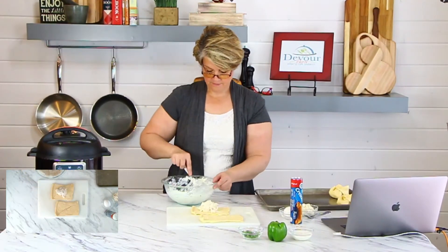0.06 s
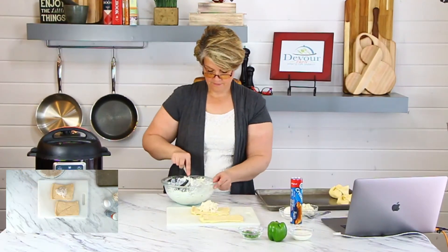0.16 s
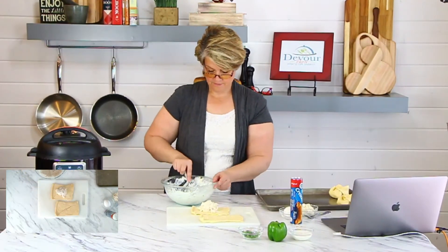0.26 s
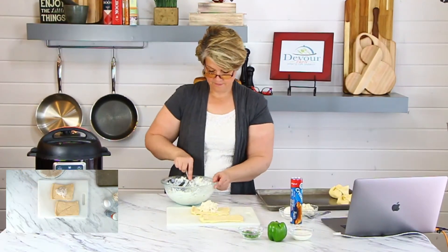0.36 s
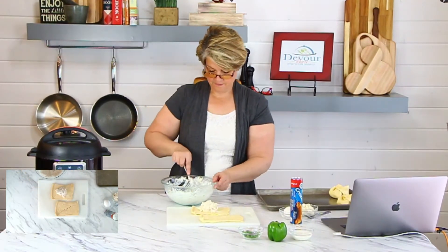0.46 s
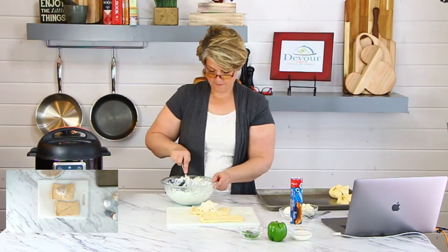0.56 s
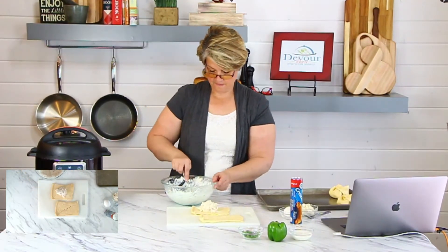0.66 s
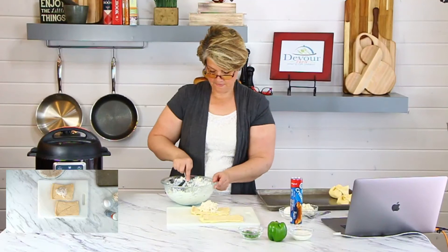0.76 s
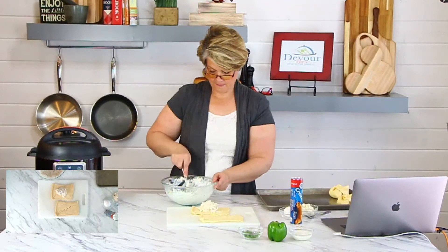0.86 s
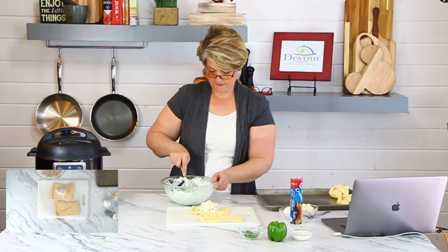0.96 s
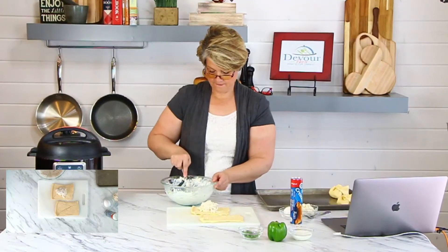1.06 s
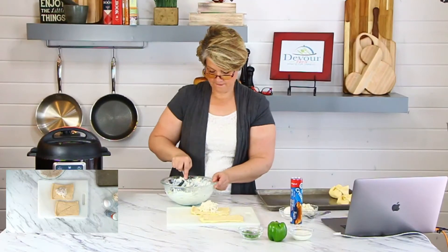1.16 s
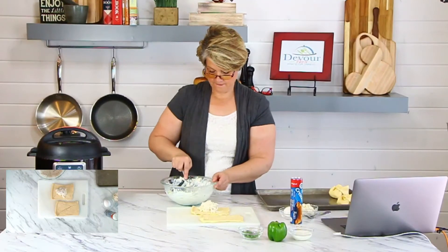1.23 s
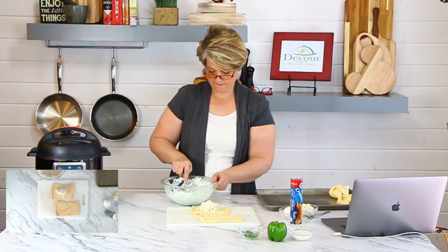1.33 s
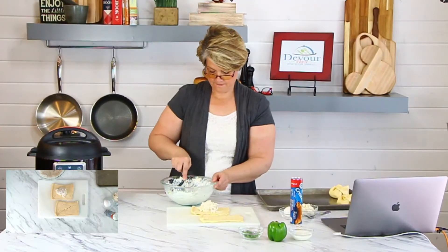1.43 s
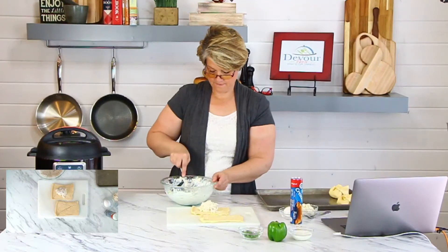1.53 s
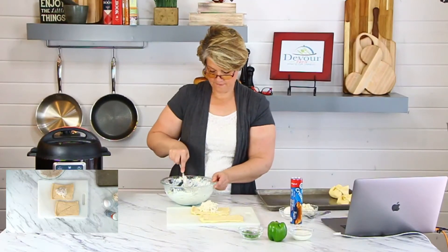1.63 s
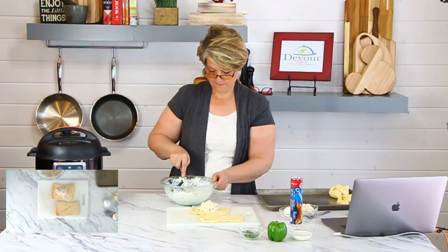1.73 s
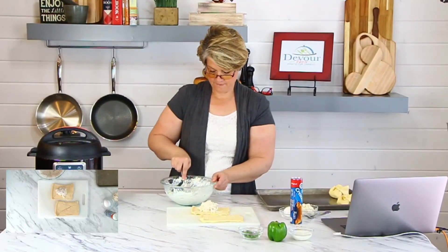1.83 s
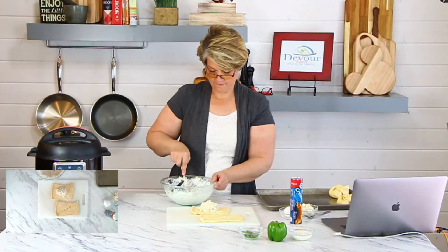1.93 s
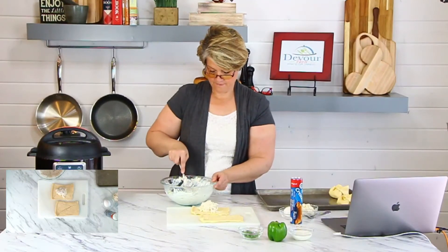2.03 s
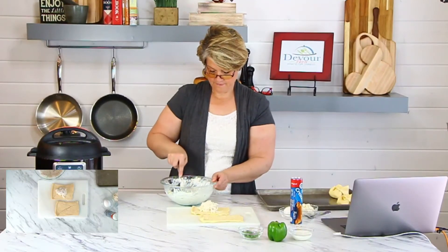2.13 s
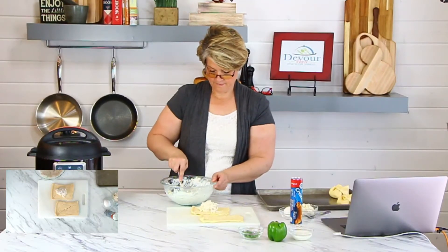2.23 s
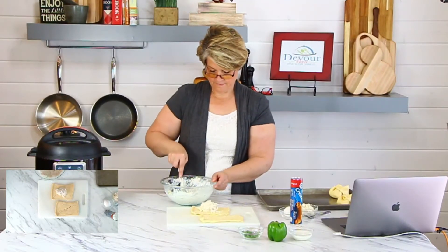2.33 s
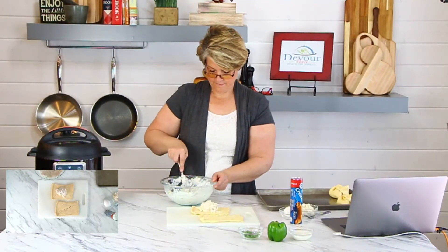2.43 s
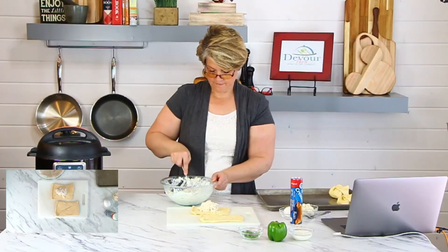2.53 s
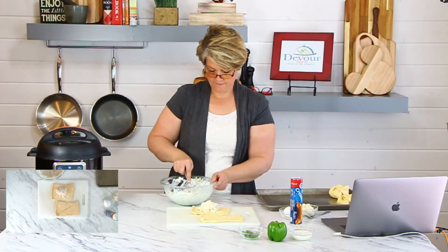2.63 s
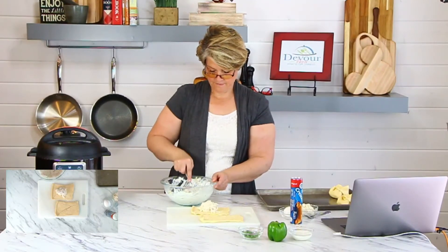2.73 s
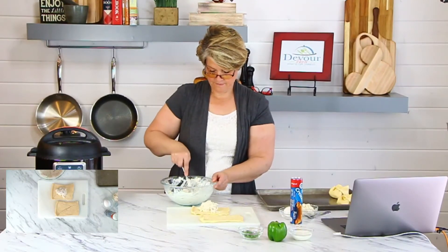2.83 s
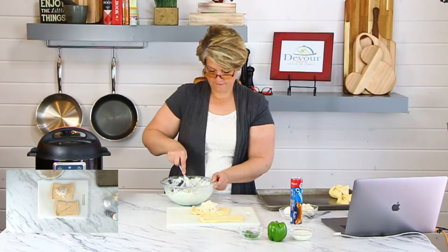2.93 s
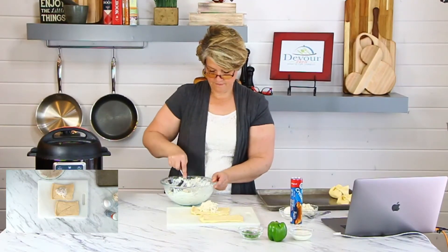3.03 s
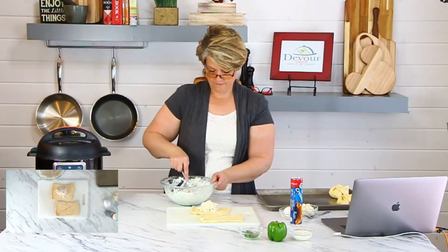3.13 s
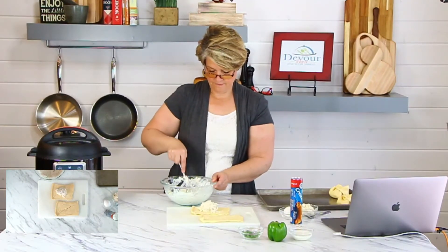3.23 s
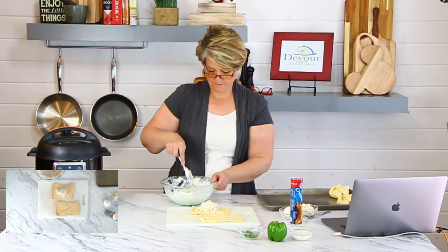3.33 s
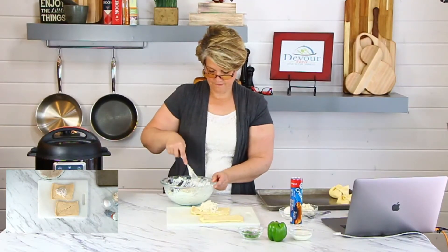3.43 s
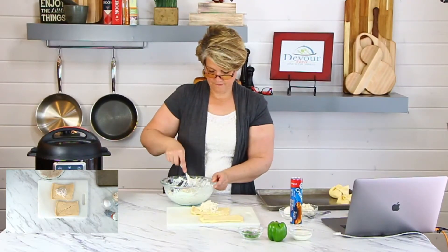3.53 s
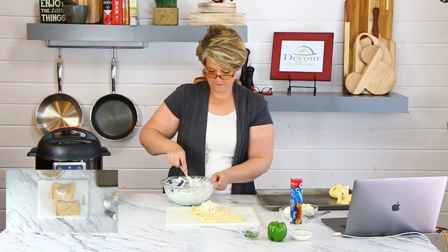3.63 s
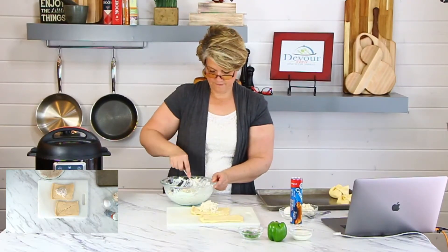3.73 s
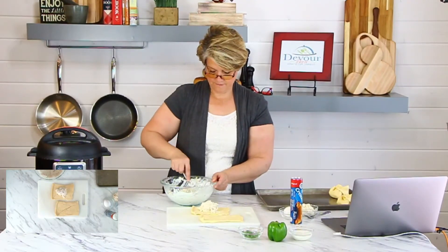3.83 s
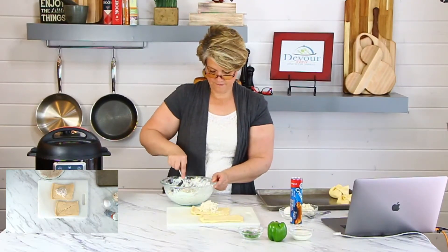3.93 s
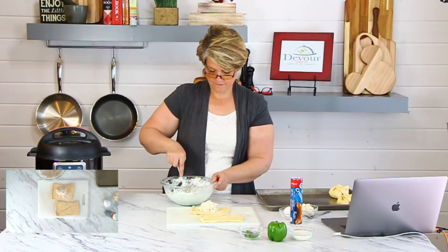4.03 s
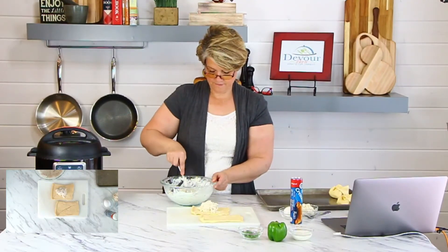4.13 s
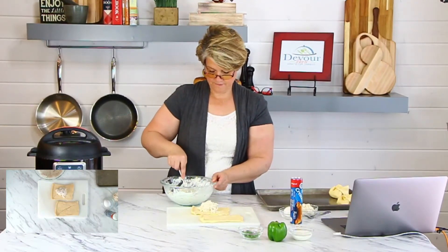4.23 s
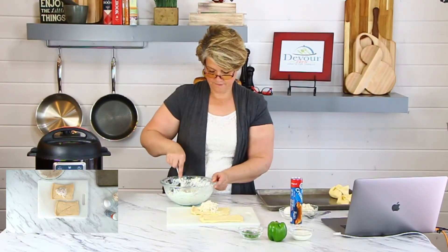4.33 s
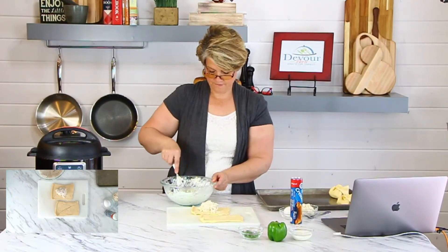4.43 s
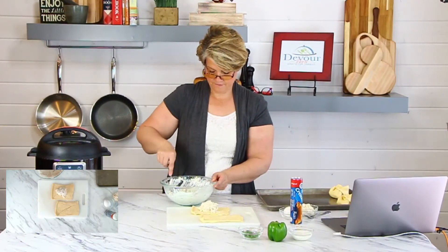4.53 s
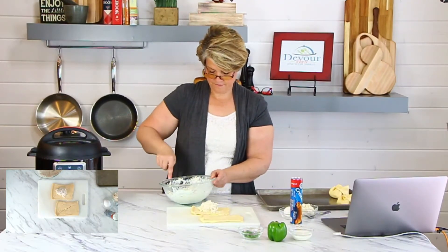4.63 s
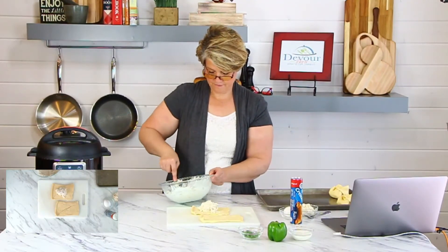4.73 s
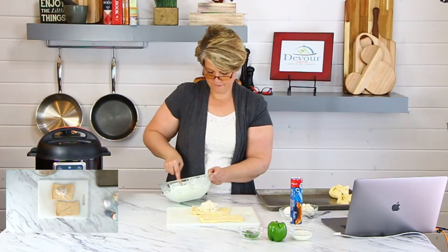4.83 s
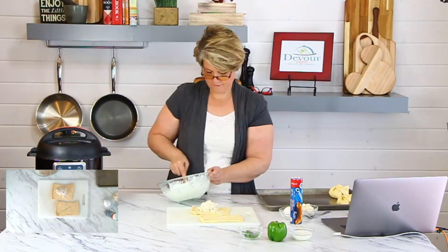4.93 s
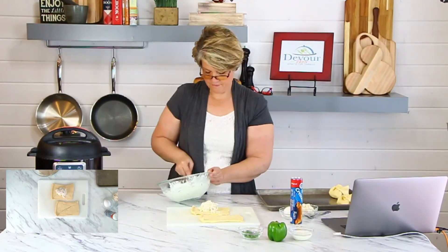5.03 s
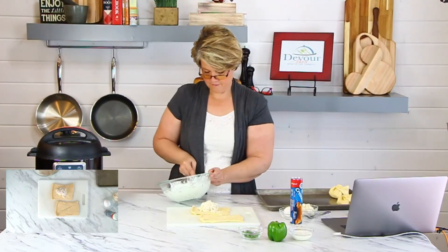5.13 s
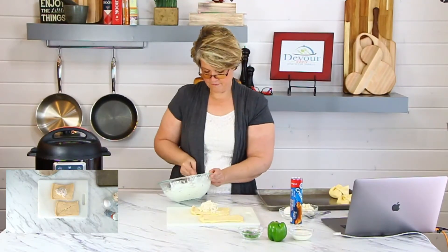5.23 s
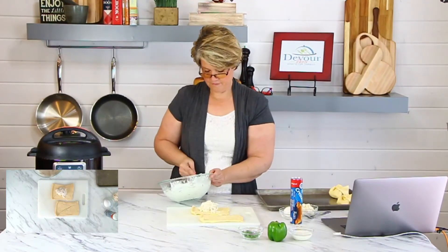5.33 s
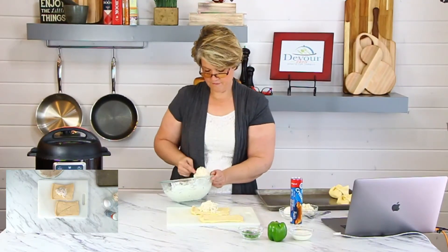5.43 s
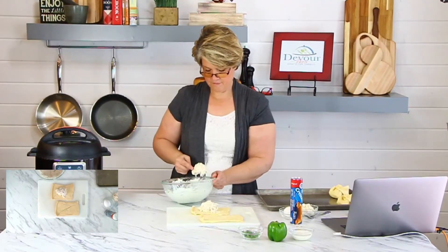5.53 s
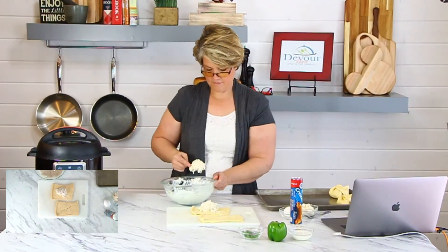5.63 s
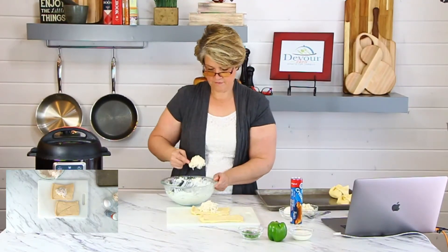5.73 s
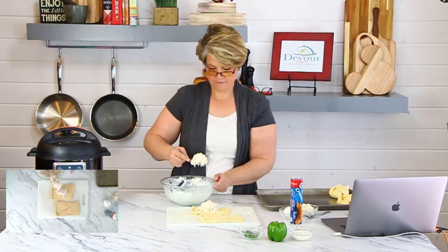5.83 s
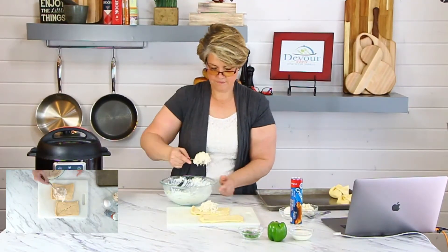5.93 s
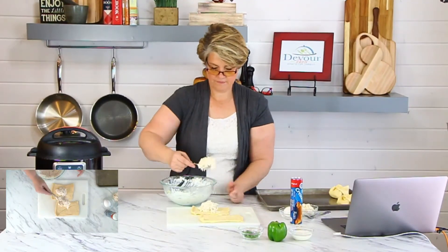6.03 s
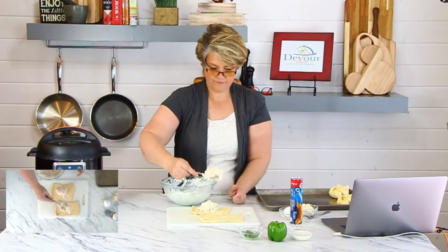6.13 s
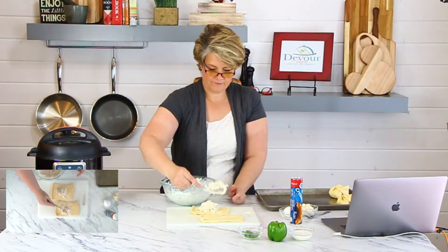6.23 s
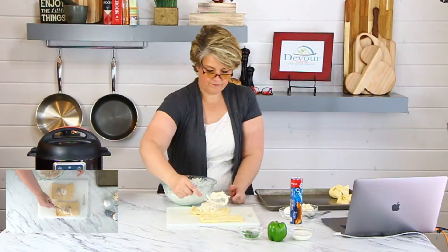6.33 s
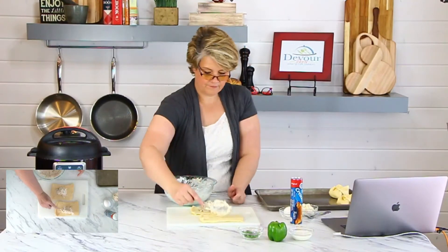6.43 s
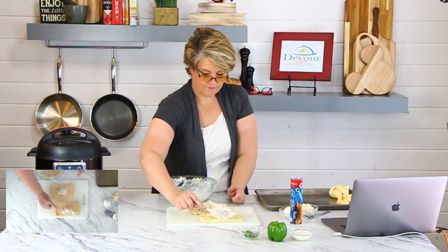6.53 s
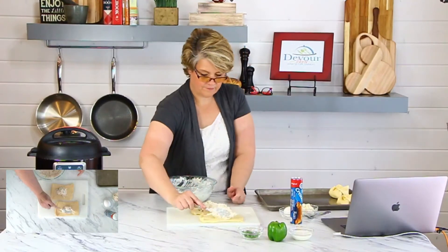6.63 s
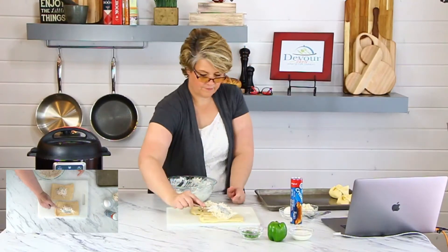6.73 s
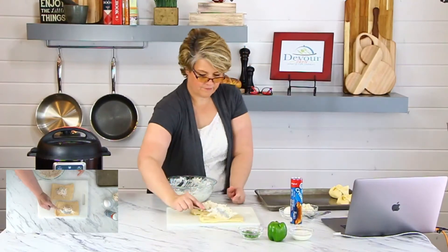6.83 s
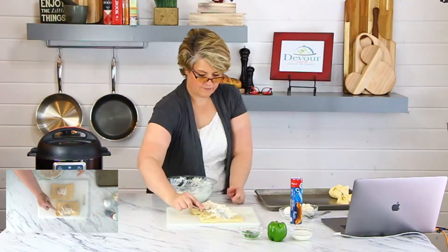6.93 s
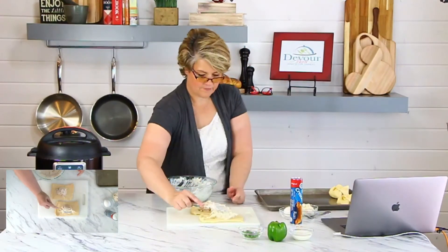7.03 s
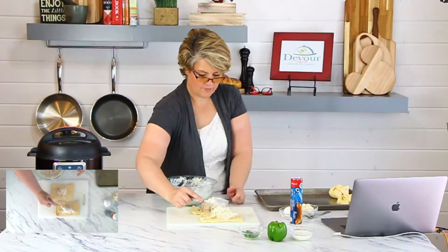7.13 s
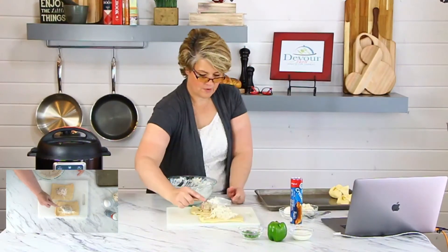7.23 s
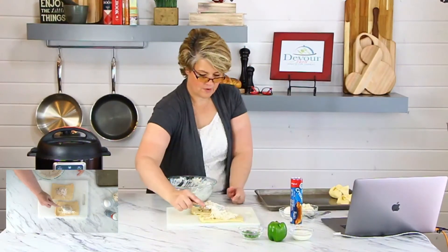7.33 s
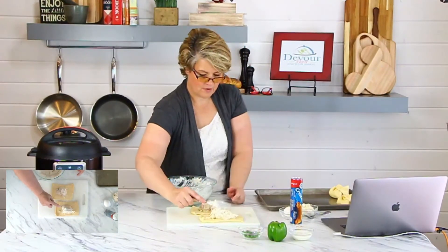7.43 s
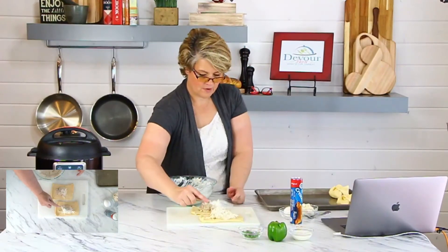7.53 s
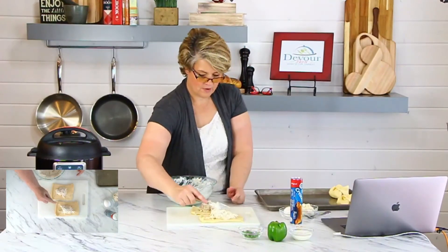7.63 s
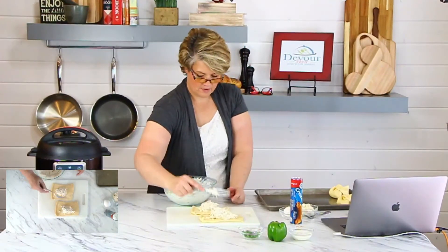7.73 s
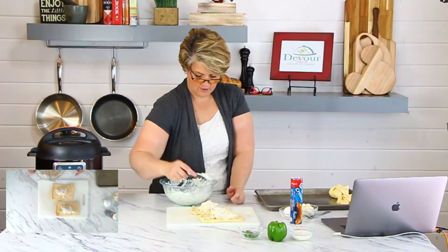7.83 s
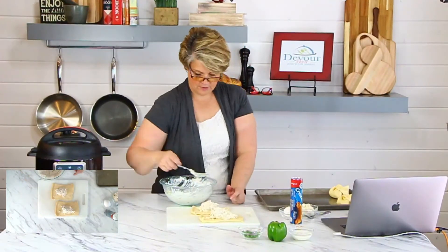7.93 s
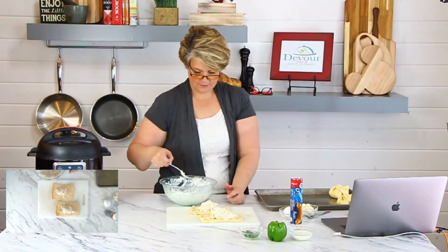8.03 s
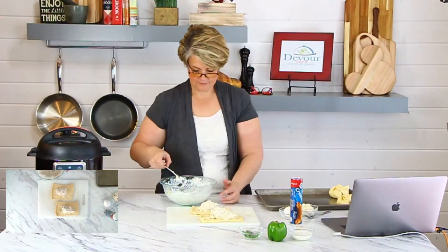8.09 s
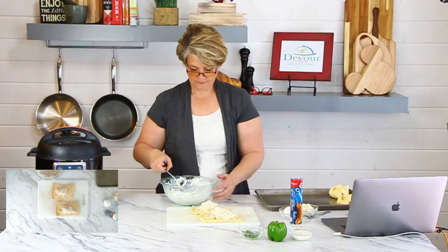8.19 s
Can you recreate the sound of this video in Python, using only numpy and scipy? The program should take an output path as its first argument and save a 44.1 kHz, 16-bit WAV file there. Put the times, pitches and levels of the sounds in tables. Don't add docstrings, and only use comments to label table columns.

```python
import sys
import numpy as np
from scipy import signal
from scipy.fft import rfft, irfft, next_fast_len
from scipy.io import wavfile
from scipy.ndimage import uniform_filter1d

SR = 44100
rng = np.random.default_rng(int(sys.argv[2]) if len(sys.argv) > 2 else 0)


def invert_db(x):
    u = np.asarray(x, float) / 20
    return 10 ** u


def to_wav(s):
    ch = np.atleast_2d(s).T
    pcm = np.round(np.clip(ch, -1, 1) * 32767)
    wavfile.write(sys.argv[1], SR, pcm.astype(np.int16))


N = 364266
TIME = np.arange(SR // 3) / SR
SCATTER_DB = 1.5

# f/Hz, level/dB, t60/s
COUNTER_MODES = [(214.8, 8.5, 0.1), (142.4, -14, 0.19), (286, 1, 0.1)]


def unit(x):
    return x / np.sqrt(np.mean(x ** 2) + 1e-20)


def filtered(x, response):
    size = next_fast_len(len(x) + 8192)
    hz = np.fft.rfftfreq(size, 1 / SR)
    return irfft(rfft(x, size) * response(hz), size)[:len(x)]


def add(track, s, sound):
    part = track[round(s * SR):][:len(sound)]
    part += sound[:len(part)]


def ring(modes, db, scatter_db, rise):
    hz, level, t60 = np.transpose(modes)[:, :, None]
    chance = rng.standard_normal((len(modes), 2))
    size = invert_db(db + level + scatter_db * chance[:, :1] - 60 * TIME / t60)
    pitch = hz * (1 + 0.01 * chance[:, 1:])
    return np.sum(size * np.sin(2 * np.pi * pitch * TIME), axis=0) * (1 - np.exp(-TIME / rise))


def resonances(modes):
    def response(f):
        total = 0
        for k, (centre, width, db) in enumerate(modes):
            damping = 1j * f * width
            total = total + (-1) ** k * invert_db(db) * damping / (centre * centre - f * f + damping)
        return total
    return response


def skid(ms):
    s = np.clip(ms, 4, 60) / 1000
    grit = rng.standard_normal(len(TIME)) * invert_db(-60 * TIME / s) * (1 - np.exp(-TIME / 0.0011))
    phase = np.angle(rfft(grit))
    return irfft(np.exp(1j * phase), len(TIME)) * invert_db(-30 * TIME / s)


def in_kitchen(sound, wet_db):
    # f/Hz, width/Hz, level/dB
    splashback = [(3460, 300, 0), (205, 52, -7), (6030, 6400, -10.5)]

    def path(f):
        echo = invert_db(4.0) * resonances(splashback)(f) * np.exp(-2j * np.pi * f * 0.0098)
        return 1 - 0.6 * resonances([(3390, 600, 0)])(f) + echo

    near_s = 0.0054
    onset = np.clip(TIME / near_s, 0, 1) ** 4
    near = invert_db(9 - 60 * TIME / 0.092)
    far = invert_db(3.5 - 60 * TIME / 0.33) * (1 - np.exp(-(TIME / 0.039) ** 3.2))
    flutter_db = 8.5 * np.cos(2 * np.pi * (TIME - near_s) / 0.0423)
    bounce = invert_db(-9 - 60 * TIME / 0.31 + flutter_db)
    noise = rng.standard_normal(len(TIME))
    low = filtered(noise, lambda hz: 1 / (1 + (hz / 1300) ** 4))
    tail = onset * (low * bounce + (noise - low) * np.hypot(near, far))
    return filtered(sound, path) + invert_db(wet_db) * signal.fftconvolve(sound, tail)[:len(TIME)]


def hush():
    # f/Hz, level/dB per Hz
    room_spectrum = [(30, -35), (108, -3), (400, 0), (850, -9.5), (1400, -6.5), (3100, -14.5), (4790, -24),
                     (11400, -48.5)]
    # t/s, level/dB
    passing = [
        (0.0, -63),
        (3.06, -62),
        (4.82, -66),
        (5.96, -65),
        (6.67, -66),
        (8.2, -66),
    ]
    passing_lifts = 0.32, 0.68, 0.067
    z = signal.stft(rng.standard_normal(N), nperseg=512)[2]
    patches = uniform_filter1d(uniform_filter1d(rng.standard_normal(z.shape), 5, 0), 10, 1)
    air = signal.istft(z * invert_db(1.53 * unit(patches)), nperseg=512)[1][:N]
    f, level = np.transpose(room_spectrum)

    def colour(hz):
        rumble = (1 + (70 / (hz + 30)) ** 2) ** 0.71
        return invert_db(np.interp(np.log(hz + 1), np.log(f), level)) * rumble

    air = filtered(air, colour)
    s, near_db = np.transpose(passing)
    lift_db = np.interp(np.arange(N) / SR, s, near_db - near_db[-1])
    below_950 = filtered(air, lambda hz: 1 / (1 + (hz / 950) ** 4))
    below_2800 = filtered(air, lambda hz: 1 / (1 + (hz / 2800) ** 4))
    ranges = below_950, below_2800 - below_950, air - below_2800
    lifted = sum(invert_db(share * lift_db) * part for share, part in zip(passing_lifts, ranges))
    return invert_db(-59.5) * lifted / np.std(air)


def traffic():
    # start t/s, end t/s, start f/Hz, end f/Hz, level/dB
    whine = [
        (.1, 1.282, 1325, 1297, -70.5),
        (.9, 1.702, 1410, 1362, -69.5),
        (1.2, 2.502, 1516, 1488, -70),
        (1.6, 3.015, 1776, 1822, -68.5),
        (2.4, 3.216, 1900, 1970, -68),
        (1.8, 2.5, 1175, 1146, -73),
        (2.4, 3.702, 1260, 1226, -65.5),
        (3.1, 4.11, 1420, 1403, -70),
    ]
    track = np.zeros(N)
    for start, end, start_hz, end_hz, db in whine:
        u = np.linspace(0, 1, int((end - start) * SR))
        carrier = np.exp(2j * np.pi * np.cumsum(start_hz + (end_hz - start_hz) * u) / SR)
        blur = []
        for _ in range(2):
            slow = filtered(rng.standard_normal(2 * SR), lambda hz: 1 / (1 + (hz / 25) ** 2))
            blur.append(slow[:len(u)])
        band = unit(carrier.real * blur[0] + carrier.imag * blur[1])
        add(track, start, invert_db(db) * np.sin(np.pi * u) ** 0.76 * band)
    return track


def filling():
    # t/s, peak level/dB, f/Hz
    ticks = [(0.2254, -69, 4400), (0.8076, -53, 4070), (0.8494, -63, 4290), (1.419, -52.5, 4760),
             (2.2707, -62, 4000), (2.697, -50, 4140), (2.7803, -51, 4300), (2.9614, -73, 4610),
             (3.5314, -74, 4230), (3.603, -73, 4370), (4.8254, -63, 4150), (5.2574, -54, 4530),
             (5.299, -54, 4070), (5.355, -60, 4180), (5.5614, -72, 4370), (6.3364, -58, 4220),
             (6.4194, -63.5, 4060), (7.224, -53, 4700), (7.2594, -64, 4030)]
    track = np.zeros(N)
    for s, db, hz in ticks:
        tick = filtered(skid(28), lambda f: resonances([(hz, 2600, 0)])(f) ** 2 / (1 + (f / 7000) ** 4))
        add(track, s, in_kitchen(invert_db(db - 33.5) * unit(tick), wet_db=-31.5))
    return track


def spoon():
    # t/s, bowl body level/dB, counter level/dB, clink level/dB, f/Hz favoured by the grip
    bottom_blows = [
        (0.273, -34, -39, -47, 5500),
        (0.68, -34.5, -42.5, -41.5, 3050),
        (1.26, -41, -53.5, -47.5, 3140),
        (2.56, -29, -38, -38.5, 3980),
        (3.775, -34, -35.5, -33, 2660),
        (3.782, -30.5, -44, -33, 3830),
    ]
    wall_blows = [
        (1.719, -32.5, -45.5, -32, 2200),
        (4.182, -14, -31, -28, 4370),
    ]
    curve_blows = [
        (3.029, -21, -35.5, -34, 4700),
        (3.707, -15, -39.5, -33, 4180),
    ]
    grazes = [
        (0.772, -52, -70, -50, 2870),
        (1.37, -65, -71, -50, 4900),
        (2.155, -45, -60, -55.5, 6640),
    ]
    # f/Hz, width/Hz, level/dB
    bottom = [(2585, 17, -5.5), (3460, 150, 0.5), (4140, 20, -12), (5160, 81, 0), (5910, 58, -5.5),
              (6730, 150, -1.5), (7300, 46, -17), (7530, 110, -14), (8930, 51, -22.5), (9400, 100, -37)]
    wall = [(2220, 130, -6.5), (2660, 140, -13.5), (3380, 93, -7.5), (3590, 23, -5), (3920, 53, -10.5),
            (4700, 30, -9), (4870, 86, -10), (5360, 34, -9), (5640, 74, -12), (6600, 28, -9),
            (7100, 180, -16), (8070, 47, -15), (8750, 78, -24), (9400, 55, -46)]
    curve = [(2200, 36, -6.5), (2750, 26, -42), (3330, 30, -1), (4040, 21, -1), (4900, 120, -21.5),
             (5400, 44, -13), (6730, 45, -15), (7000, 40, -15), (7730, 44, -14.5), (8850, 50, -27),
             (9900, 78, -9.5)]
    coated = [(2100, 94, 3.5), (3050, 160, -5), (3720, 100, -5), (4800, 250, -8), (5400, 160, -12)]
    # f/Hz, level/dB, t60/s
    body_modes = [(648.5, 4, 0.02), (875, -17, 0.028), (1140, -26, 0.043)]
    filling_modes = [(505, 6.5, 0.016), (362, -10.5, 0.043)]
    track = np.zeros(N)
    places = (bottom_blows, bottom), (wall_blows, wall), (curve_blows, curve), (grazes, coated)
    for blows, modes in places:
        for s, body_db, counter_db, clink_db, grip_hz in blows:
            low = ring(body_modes, body_db + 2.5, SCATTER_DB, 0.0022)
            low = low + ring(filling_modes, body_db - 2, SCATTER_DB, 0.0011)
            low = low + ring(COUNTER_MODES, counter_db + 4.5, SCATTER_DB, 0.0081)
            damped = [(hz, w + 52, db + SCATTER_DB * rng.standard_normal()) for hz, w, db in modes]
            grip = resonances([(grip_hz, 390, 10)])

            def colour(f):
                broad = invert_db(-20.0) * (f > 1500) / (1 + (f / 8000) ** 6)
                return (1 + grip(f)) * (resonances(damped)(f) + broad) / (1 + (f / 10600) ** 12)

            clink = invert_db(clink_db - 20.0) * unit(filtered(skid(11.4), colour))
            add(track, s + 0.0008, in_kitchen(low + clink, wet_db=-32.5))
            add(track, s - 0.007, ring(filling_modes, body_db - 23, SCATTER_DB, 0.0035))
            lead = TIME[:882] - 0.02
            scrape = unit(filtered(rng.standard_normal(len(lead)), colour)) * np.exp(lead / 0.0033)
            add(track, s + lead[0], invert_db(clink_db - 19) * scrape)
    return track


def bowl():
    # t/s, body level/dB, counter level/dB, hardness level/dB
    set_down = [
        (5.629, -44, -31, -34),
        (5.633, -23.5, -30, -29),
        (5.639, -14.5, -21, -27.5),
        (5.647, -20.5, -19, -54),
        (5.685, -37, -28.5, -56),
        (5.701, -27.5, -25.5, -53),
        (5.713, -67, -34, -66),
        (5.751, -54, -55.5, -76),
        (5.794, -46, -47, -50.5),
    ]
    # f/Hz, level/dB, t60/s
    seated_modes = [(353, 0, 0.035), (425, 3, 0.032), (570, 5.5, 0.02), (708, -11, 0.056),
                    (846, -11.5, 0.032)]
    foot_modes = [(1370, 2, 0.024), (1690, 8, 0.012), (1960, -5, 0.019), (2260, -4.5, 0.024),
                  (3200, -30, .015), (4300, -17, 0.0088)]
    track = np.zeros(N)
    for s, body_db, counter_db, hard_db in set_down:
        thud = ring(seated_modes, body_db - 0.5, SCATTER_DB, 0.002)
        thud = thud + ring(COUNTER_MODES, counter_db - 6.5, SCATTER_DB, 0.0016)
        knock = ring(foot_modes, hard_db - 1, SCATTER_DB, 0.0018)
        add(track, s, in_kitchen(-thud - knock, wet_db=-37))
    return track


def crack(db, t60, low_hz):
    snap = filtered(rng.standard_normal(len(TIME)), lambda hz: hz > low_hz)
    return invert_db(db - 60 * TIME / t60) * snap


def rim():
    # t/s, peak level/dB
    rim_blow = [
        (8.2463, -6),
    ]
    # f/Hz, level/dB, t60/s
    rim_modes = [(575, -9, 0.04), (640, -10, 0.086), (950, -21, 0.029), (1420, -16.5, 0.3),
                 (1640, 9, 0.011), (1900, -38, 0.032), (2180, -18, 0.025), (2542, -16.5, 0.45),
                 (3700, -0.5, 0.011), (5454, -0.5, 0.017), (7180, -8.5, 0.022), (8470, -32, 0.052),
                 (9540, -30, 0.052), (197, -18.5, 0.26)]
    track = np.zeros(N)
    for s, db in rim_blow:
        blow = ring(rim_modes, db - 0.7, 0, 0.0015) + crack(db - 24, 0.1, low_hz=1500)
        add(track, s, in_kitchen(blow, wet_db=-40.0))
    return track


def suppressed(x):
    power = np.abs(uniform_filter1d(x ** 2, int(0.007 * SR)))
    return x * power / (power + invert_db(-62) ** 2)


def scene():
    blows = suppressed(spoon() + rim())
    return (hush() + traffic() + filling() + blows + bowl())[None]


def roll_off(x):
    return signal.sosfilt(signal.butter(12, 11590, fs=SR, output="sos"), x)


def record(dry):
    def microphone(hz):
        bass = 1j * hz / 70
        return (bass / (1 + bass)) ** 3 / (1 + (hz / 11000) ** 16)

    mix = filtered(dry[0], microphone)[None]
    return roll_off(mix)


dry = scene()
out = record(dry)
to_wav(out)
```